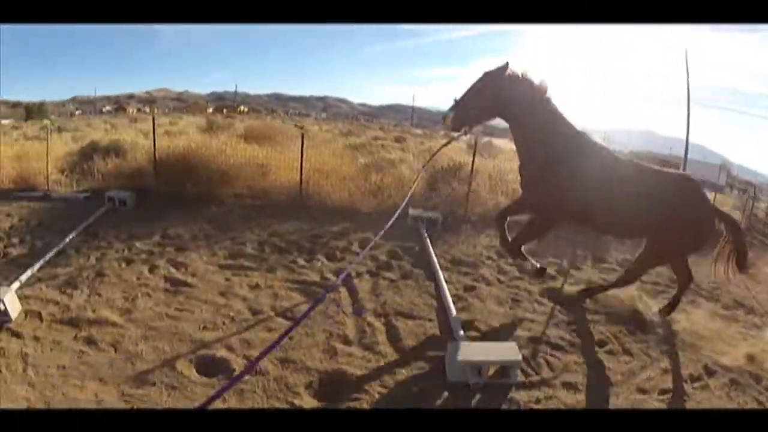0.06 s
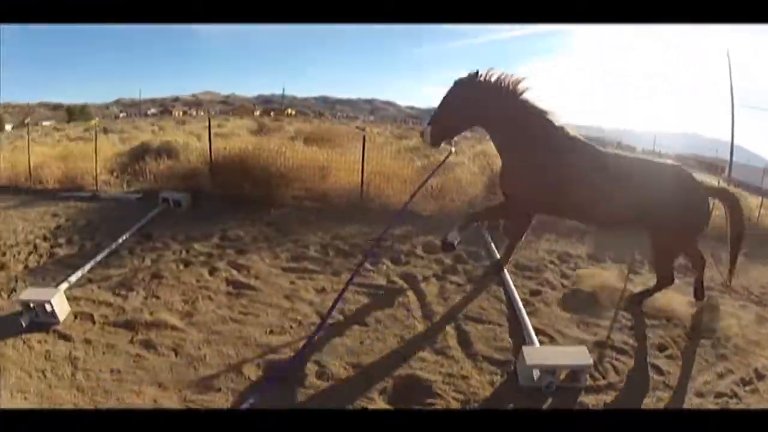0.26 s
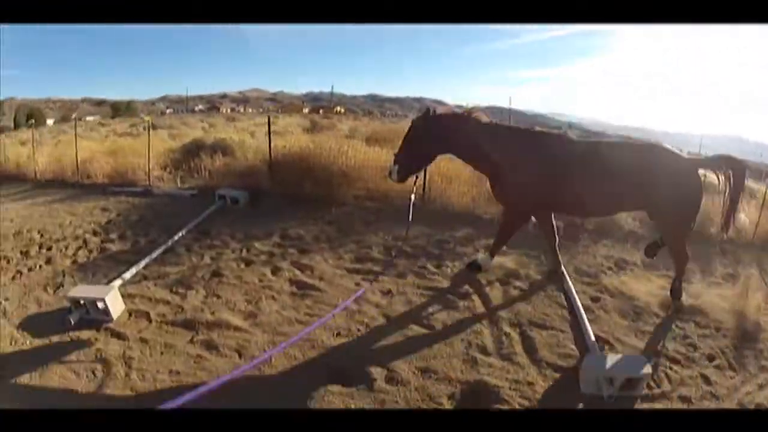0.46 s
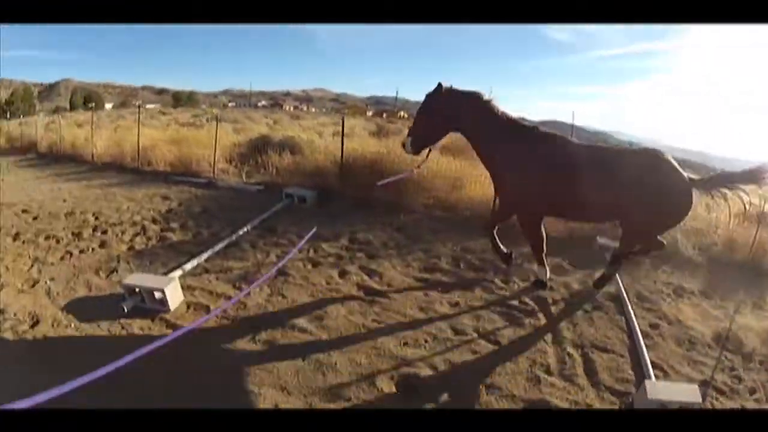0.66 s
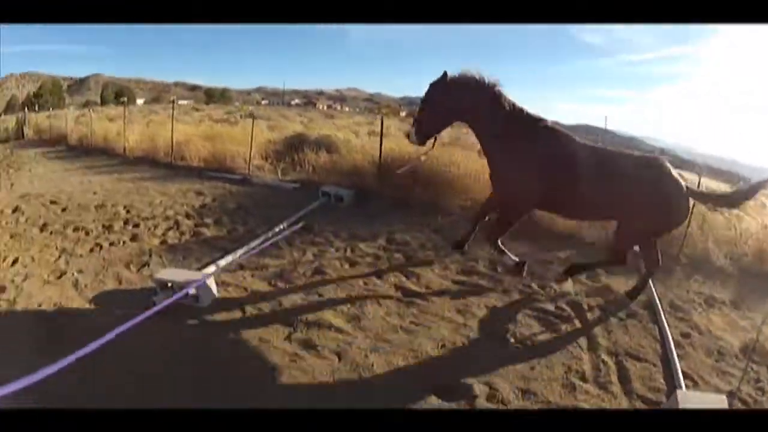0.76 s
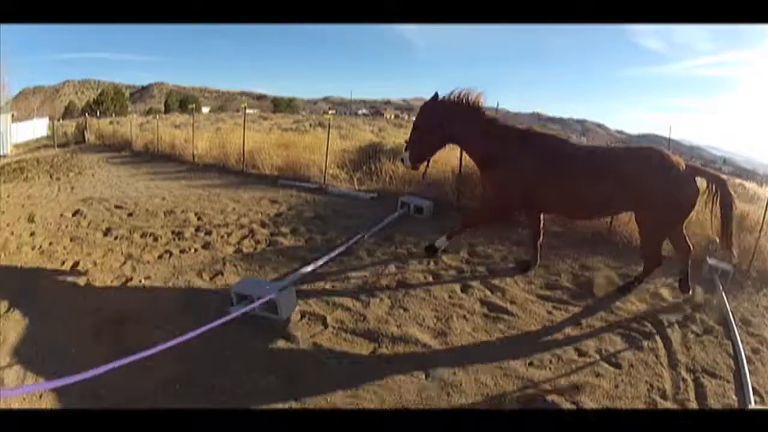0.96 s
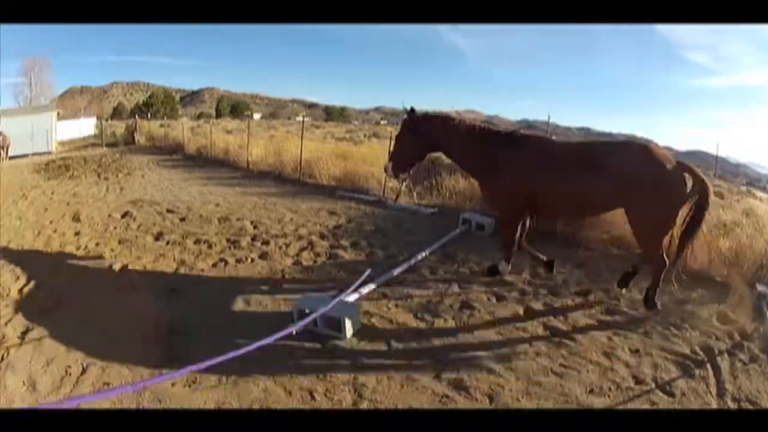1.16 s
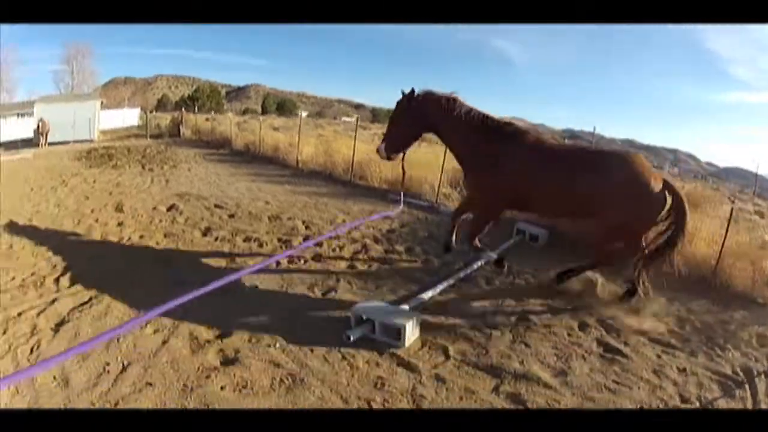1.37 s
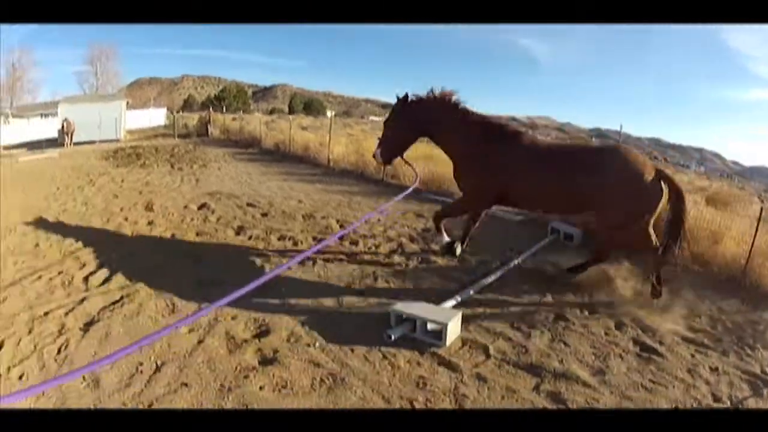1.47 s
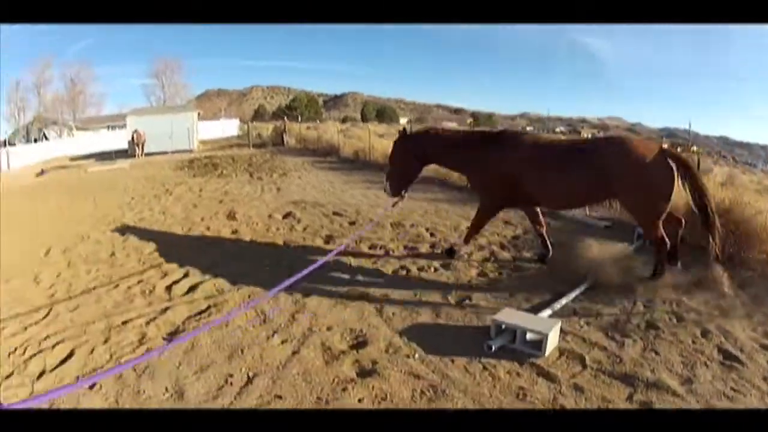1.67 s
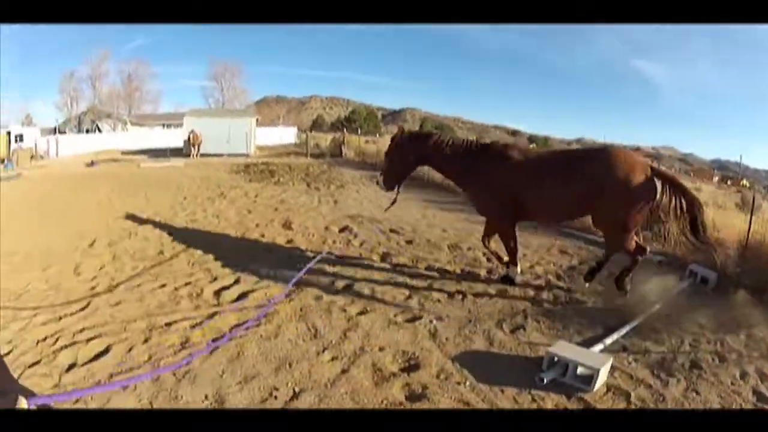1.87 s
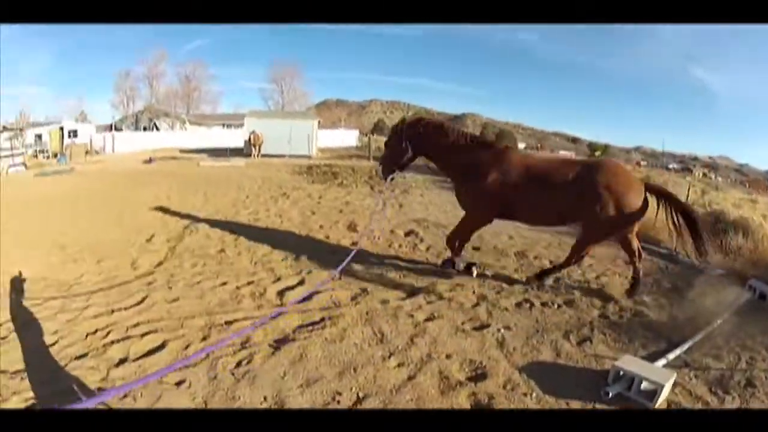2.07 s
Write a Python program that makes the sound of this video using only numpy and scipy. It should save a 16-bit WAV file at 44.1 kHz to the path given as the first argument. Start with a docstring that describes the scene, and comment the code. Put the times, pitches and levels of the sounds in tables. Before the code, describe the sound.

Hollow clattering knock of a hoof on a ground pole, sandy hoofbeats and low wind buffeting outdoors

```python
"""Wind buffets a microphone, a low rumble with a faster flutter and a thin hiss: noise shaped in colour and level.
A horse trots over ground poles in a sandy paddock: a hoof raps a hollow pole, which rattles and scrapes
on its block (pushes and noise into resonances). Damped sines give the hoof thuds and thrown clods;
filtered noise gives the grit; hard clicks and a late echoing tap ring short resonances.
The sound is sampled coarsely and held, so the low range is mirrored in the treble."""
import sys
import numpy as np
from scipy.fft import rfft, irfft, next_fast_len
from scipy.io import wavfile
from scipy.ndimage import map_coordinates

SR = 44100
rng = np.random.default_rng(int(sys.argv[2]) if len(sys.argv) > 2 else 0)


def master(y):
    """Save y as 16-bit WAV."""
    cut = np.clip(np.atleast_2d(y).T, -1, 1)
    pcm = np.round(cut * 32767)  # scale
    wavfile.write(sys.argv[1], SR, pcm.astype(np.int16))


N = 92610  # samples, 2.1 s
T = np.arange(SR // 5) / SR  # time within one short event, s


def amp(db):
    """Level definition: 20 dB is a factor of ten in amplitude."""
    return 10 ** (np.asarray(db) / 20)


def unit(x):
    """Normalisation to a root-mean-square of one."""
    return x / np.sqrt(np.mean(x ** 2) + 1e-20)


def curve(rows):
    """Linear interpolation of (t/s, value) rows, one value per sample."""
    return np.interp(np.arange(N) / SR, *np.transpose(rows))


def wobble(rate):
    """Spline interpolation of random knots, rate of them a second: a smooth random curve."""
    return map_coordinates(rng.standard_normal(N // 100), [np.arange(N) * rate / SR])


def filtered(x, response):
    """Linear filtering: the spectrum of x times a complex response of frequency."""
    m = next_fast_len(len(x) + 8192)
    hz = np.fft.rfftfreq(m, 1 / SR)
    return irfft(rfft(x, m) * response(hz), m)[:len(x)]


def noise(points):
    """Spectral shaping: white noise coloured by (f/Hz, level/dB) points on a log frequency axis."""
    f, level_db = np.transpose(points)
    return filtered(rng.standard_normal(N), lambda hz: amp(np.interp(np.log(hz + 1), np.log(f + 1), level_db)))


def peak(f, hz, width_hz):
    """Resonance: the causal band-pass response of one damped mode, unity at its centre."""
    return 1j * f * width_hz / (hz * hz - f * f + 1j * f * width_hz)


def ring(hz, cycles, edge):
    """Free damped oscillation: a sine with a softened start, falling to 1/e over the given cycles."""
    start = (1 - np.exp(-T * hz * edge)) ** 2
    return np.sin(2 * np.pi * hz * T) * np.exp(-T * hz / cycles) * start


def burst(db, t60, rise_s=0.0012):
    """Exponential decay of random contact: gritty noise that starts fast and falls 60 dB in t60."""
    return amp(db - 60 * T / t60) * (1 - np.exp(-T / rise_s)) * rng.standard_normal(len(T))


def spread(f, delay_s):
    """Dispersion of bending waves: delay (delay_s at 1 kHz) falls as 1/sqrt(f), counted from that at 600 Hz."""
    return np.exp(-2j * np.pi * delay_s * (2 * np.sqrt(1000 * f) - f * np.sqrt(1000 / 600)))


def add(track, s, x):
    """Superposition: mix x into track from second s."""
    part = track[round(s * SR):][:len(x)]
    part += x[:len(part)]


# Wind course: t/s, low buffeting level/dB, flutter level/dB (before the lift)
WIND = [(0.0, -46, -40.5), (0.04, -38, -42.5), (0.16, -44, -49), (0.23, -34, -44), (0.26, -46, -33.5),
        (0.34, -34.5, -43), (0.43, -43.5, -43), (0.55, -41, -42), (0.62, -30, -59), (0.66, -35, -39.5),
        (0.69, -36.5, -45.5), (0.78, -35.5, -47), (0.81, -43, -52), (0.84, -34, -60.5), (0.93, -48, -52.5),
        (0.96, -38, -45.5), (1.06, -52.5, -54), (1.1, -39, -52.5), (1.2, -43, -56), (1.22, -37.5, -45.5),
        (1.34, -48.5, -53), (1.44, -37.5, -53), (1.57, -40, -49.5), (1.71, -63, -59.5), (1.75, -49, -58),
        (1.78, -56.5, -64), (1.96, -46, -61), (1.98, -50, -58), (2.02, -45, -60), (2.1, -45.5, -56)]
# Relative spectra of buffeting, flutter and hiss: f/Hz, level/dB
RUMBLE = [(12, -27.5), (28, -3), (65, 0.5), (120, -2.5), (200, -12), (400, -54), (1000, -120)]
FLUTTER = [(50, -62), (120, -4), (190, -2), (300, -4), (450, -12.5), (650, -16), (900, -27.5), (1300, -44),
           (2000, -52.5), (4000, -120)]
HISS = [(500, -24), (1200, -4.5), (2200, -3), (3000, -2), (4500, -5.5), (6000, -7)]
# Background hiss course: t/s, level/dB (before the lift)
AIR = [(0.0, -66), (0.17, -63.5), (0.44, -63), (0.5, -60), (0.67, -64), (1.27, -65.5), (1.46, -62.5),
       (1.59, -61.5), (1.86, -64.5), (2.1, -65.5)]
LIFT_DB = 2.5  # added to flutter and hiss
GRAIN_DB, GRAIN_RATE = 2.5, 61  # flutter unevenness: depth, knots a second


def wind():
    """Amplitude-modulated turbulence noise: low buffeting and a faster flutter over a thin hiss."""
    s, low_db, flutter_db = np.transpose(WIND)
    low = unit(amp(0.5 * wobble(13.74)) * noise(RUMBLE))
    flutter = unit(amp(GRAIN_DB * wobble(GRAIN_RATE)) * noise(FLUTTER))
    hiss = unit(noise(HISS) * amp(0.5 * wobble(40)))
    low_level = amp(curve(np.c_[s, low_db]))
    flutter_level = amp(curve(np.c_[s, flutter_db]) + LIFT_DB)
    hiss_level = amp(curve(AIR) + LIFT_DB)
    return low_level * low + flutter_level * flutter + hiss_level * hiss


# Grit and tack ticks: t/s, noise level before filtering/dB, centre f/Hz, t60/s
TICKS = [(.085, -46, 2700, 0.081), (.496, -39, 2600, 0.071), (.592, -36, 2040, 0.096),
         (.625, -39.5, 2830, 0.026), (.689, -45.5, 2120, 0.056), (.835, -38, 2170, 0.035),
         (.853, -51, 3540, 0.096), (.879, -49, 2000, 0.09), (1.015, -47.5, 1970, 0.063),
         (1.087, -35.5, 1980, 0.012), (1.127, -53, 2800, .08), (1.248, -46, 2500, 0.23),
         (1.330, -45.5, 2530, 0.068), (1.470, -45, 2500, 0.054), (1.493, -43.5, 3100, 0.12),
         (1.541, -29, 2450, 0.028), (1.641, -45, 1500, 0.025), (1.653, -39, 2000, 0.023),
         (1.863, -39.5, 3500, 0.018), (1.931, -56, 1500, .1), (1.953, -41.5, 2500, 0.031)]
TICK_WIDTH_RATIO = 1.61  # width over centre of each of two cascaded resonances


def ticks():
    """Band-passed noise bursts: short puffs of grit, each with its own colour."""
    out = np.zeros(N)
    for s, db, hz, t60 in TICKS:
        puff = burst(db, t60, rise_s=0.0005)
        add(out, s, filtered(puff, lambda f: peak(f, hz, TICK_WIDTH_RATIO * hz) ** 2))
    return out


# Hard dry clicks: t/s, edge level/dB, ring f/Hz, ring width before squaring/Hz,
# body level re ring/dB, tail level re edge/dB
CLICKS = [(1.2272, -42, 2540, 3500, -2, -22), (1.2581, -17.5, 2910, 2870, -8, -9),
          (1.3025, -36.5, 2200, 2500, -24, -20), (1.4235, -34.5, 4000, 4060, -20, -5),
          (1.5392, -29, 3200, 2970, -22, -11.5)]
BODY_HZ, BODY_WIDTH_HZ, TAIL_T60 = 835, 270, 0.026  # low resonance; tail decay in s


def click():
    """Impulse response: a hard edge rings a bright and a low resonance, with a brief gritty tail."""
    out = np.zeros(N)
    for s, db, hz, width_hz, body_db, tail_db in CLICKS:
        edge = amp(db) * (8 * (T == 0) + burst(tail_db, TAIL_T60))
        body = lambda f: amp(body_db) * peak(f, BODY_HZ, BODY_WIDTH_HZ)
        add(out, s, filtered(edge, lambda f: peak(f, hz, width_hz) ** 2 + body(f)))
    return out


# Light tap, lead-in contacts first: t/s, level/dB
TAP = [(1.7189, -42.5), (1.726, -29.5), (1.7271, -14.5)]
# Resonances of the tap: f/Hz, width before squaring/Hz, level/dB
TAP_RING = [(810, 680, -5.5), (1730, 570, -4.5), (2080, 500, -2.5), (2450, 810, 0.5), (3380, 430, -16)]
ECHO_S, ECHO_DB, LATER_ECHO_DB = 0.00243, -2, -9  # spacing; first echo; each further one re the last
TAP_SPREAD_S, TAP_TAIL_DB = 0.00159, -8  # bending-wave delay at 1 kHz; gritty tail


def tap():
    """Dispersion and end reflection: an edge smeared into a falling chirp, repeated by the pole's ends."""
    out = np.zeros(N)
    for s, db in TAP:
        add(out, s, amp(db) * (8 * (T == 0) + burst(TAP_TAIL_DB, 0.027)))
    lag = lambda f: np.exp(-2j * np.pi * f * ECHO_S)
    # the geometric series sums all the later echoes
    echoes = lambda f: 1 + amp(ECHO_DB) * lag(f) / (1 - amp(LATER_ECHO_DB) * lag(f))
    modes = lambda f: sum(amp(db) * peak(f, hz, w) ** 2 for hz, w, db in TAP_RING)
    return filtered(out, lambda f: spread(f, TAP_SPREAD_S) * echoes(f) * modes(f))


# Hoof falls in sand: t/s, level/dB, pitch f/Hz, cycles to fade to 1/e
THUDS = [(0.174, -20.5, 155, 1.24), (.223, -15.5, 136, 0.92), (0.388, -14.5, 174, 0.81),
         (0.552, -17, 180, 0.9), (0.625, -21.5, 194, 1.33), (0.681, -19, 186.4, 0.94),
         (.689, -17.5, 327, 0.68), (0.714, -18, 151, 0.76), (0.834, -21.5, 267, 2.2),
         (.879, -16, 219, 0.47), (1.224, -34, 252, 0.85), (1.258, -23.5, 355, 0.5),
         (1.270, -27.5, 224, 0.95), (1.439, -17.5, 270, 0.33), (1.471, -21, 277, 0.87),
         (1.523, -23, 92.6, 0.87), (1.564, -16.5, 147, 0.4), (1.641, -23, 242, 0.77),
         (1.930, -31, 250, 0.66)]
# Clods of sand landing: t/s, level/dB, pitch f/Hz
CLODS = [(.606, -31.5, 840), (.615, -27, 406), (.636, -33, 500), (.660, -34, 830), (.689, -38, 630),
         (0.8342, -25.5, 620), (.880, -36, 696), (1.016, -37, 704), (1.227, -37, 920), (1.331, -39.5, 590),
         (1.539, -34.5, 950), (1.642, -35.5, 650), (1.932, -46, 650)]
THUD_EDGE, CLOD_CYCLES, CLOD_EDGE = 4.47, 1.34, 3.3  # start sharpness; cycles of fading


def hooves():
    """Heavily damped oscillation: soft low pushes of hooves in sand, and higher pats of thrown clods."""
    out = np.zeros(N)
    for s, db, hz, cycles in THUDS:
        add(out, s, -amp(db) * ring(hz, cycles, THUD_EDGE))
    for s, db, hz in CLODS:
        add(out, s, amp(db) * ring(hz, CLOD_CYCLES, CLOD_EDGE))
    return out


# Contacts of the pole: t/s, blow level before POLE_DB/dB, contact time/ms, clack level/dB, clack f/Hz,
# rattle level/dB, rattle t60/s
KNOCKS = [(0.2498, -40.5, 0.4, -38, 1500, -32.5, .03), (0.2513, -4.5, 0.63, -14, 3300, -27, 0.028),
          (0.252, -8.5, 0.73, -3, 2420, -6, 0.054), (0.2543, -14, 0.35, -6.5, 3300, -24, .04),
          (0.2572, -23, 0.45, -7, 2130, -32, .04), (0.2581, -22, 1.4, -38, 1500, -36, 0.11),
          (0.272, -19, 0.73, -18, 2500, -31, .04), (0.2738, -6, 1, -9.5, 2350, -21, .05),
          (0.2788, -17, 1.2, -19, 1970, -21.5, .1), (.3010, -25.5, 1.3, -46, 1800, -44, .04),
          (.3020, -8, 1.1, -25, 2320, -20, .06), (0.3162, -26, 0.31, -12.5, 3300, -15, 0.12),
          (.3210, -25, 0.31, -13.5, 2000, -25, .06), (.3235, -25, 0.85, -14.5, 1750, -27, .05),
          (0.326, -21.5, 0.42, -27, 1170, -27.5, .07), (0.3294, -23.5, 1.04, -34, 810, -30.5, .06),
          (.3330, -27, 0.96, -21, 2090, -30.5, 0.11), (0.341, -17, 2.4, -33, 1500, -34, .05),
          (.3460, -3, 3.34, -20, 3140, -24, .07), (.3800, -24, 1.06, -35, 2210, -33, 0.069),
          (.4050, -39, 0.8, -35.5, 2100, -31, .06)]
# Modes of the hollow pole: f/Hz, width/Hz, level/dB
POLE = [(155, 95, -2.5), (427, 108, 4.5), (550, 50, -15.5), (618, 126, 8), (745, 43, -8), (1080, 250, -18),
        (1500, 400, -6.5), (2120, 70, -19), (2550, 240, -10.5), (3300, 700, -32.5)]
POLE_DB, CLACK_CYCLES = 4.5, 1.8  # lift of the blows; cycles of clack fading
SPREAD_S = 0.0012  # bending-wave delay at 1 kHz, before the 600 Hz delay is taken off


def pole():
    """Modal excitation: rounded pushes and rattles ring the pole's modes, and each contact adds a clack."""
    force, clacks = np.zeros(N), np.zeros(N)
    for s, db, ms, clack_db, clack_hz, rattle_db, t60 in KNOCKS:
        # a longer contact has a lower push
        push = np.sin(np.pi * np.clip(T * 1000 / ms, 0, 1)) ** 2 / (2 * ms)
        add(force, s, amp(db + POLE_DB) * push + burst(rattle_db, t60))
        add(clacks, s, amp(clack_db) * ring(clack_hz, CLACK_CYCLES, edge=4.4))
    modes = lambda f: sum(amp(db) * peak(f, hz, w) for hz, w, db in POLE)
    return clacks - filtered(force, lambda f: spread(f, SPREAD_S) * modes(f))


def scene():
    """Superposition of all sources in one channel."""
    return (wind() + ticks() + click() + tap() + hooves() + pole())[None]


HOLD_HZ, TOP_HZ = 12000, 15400  # coarse sampling rate; start of the upper roll-off


def record(dry):
    """Aliasing by sample and hold: low-pass, mirror images round the coarse rate, then band limit."""
    gate = lambda f: np.clip((HOLD_HZ / 2 - f) / 900 + 0.58, 0, 1)
    base = filtered(dry[0], lambda f: gate(f) / (1 + 1j * f / 4200) ** 2 * 1.27)
    # the first harmonic of the sampling comb makes the images; the sinc is the hold
    comb = 1 + 2 * np.cos(2 * np.pi * HOLD_HZ * np.arange(N) / SR)
    cut = lambda f: amp(-np.clip((f - TOP_HZ) / 1000, 0, 1) * 30) * (f < 16484)
    return filtered(base * comb, lambda f: np.sinc(f / HOLD_HZ) * cut(f))[None]


dry = scene()
out = record(dry)
master(out)
```